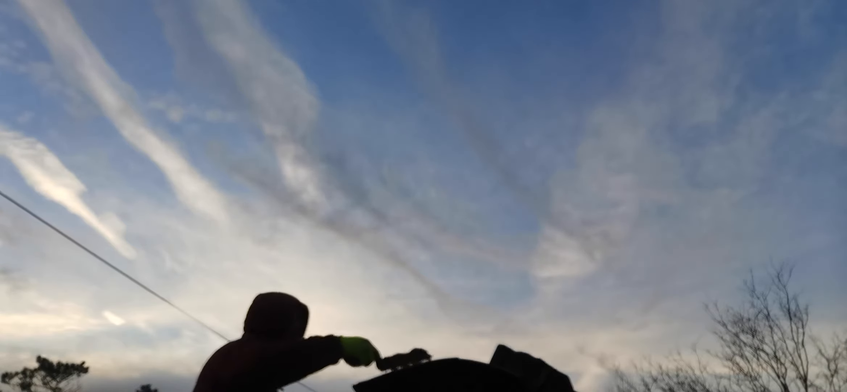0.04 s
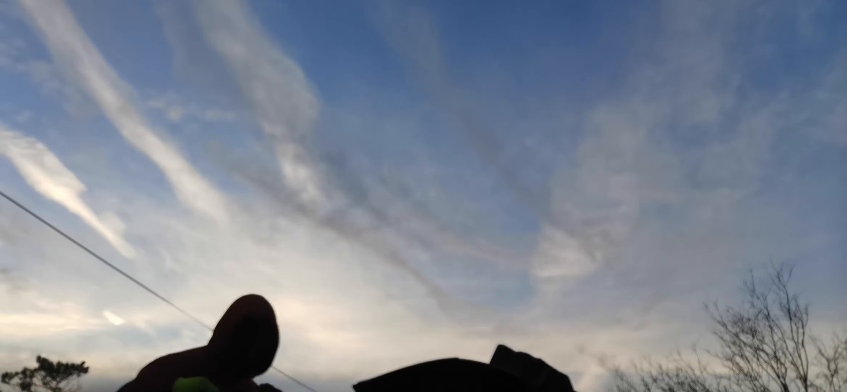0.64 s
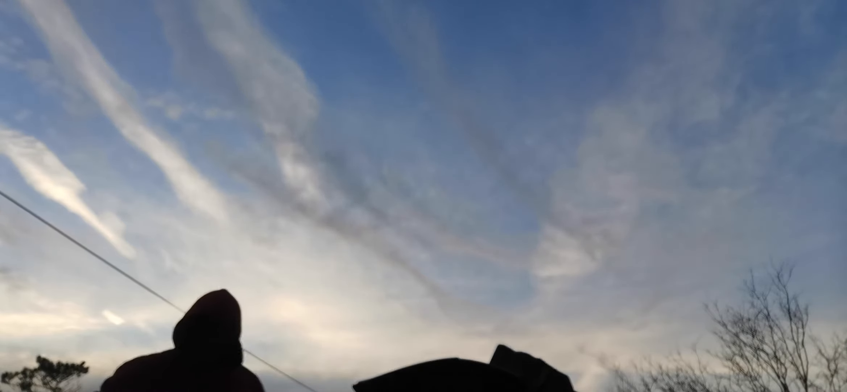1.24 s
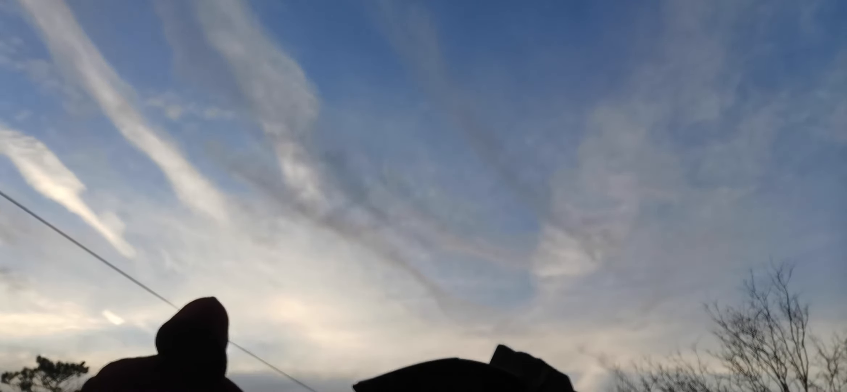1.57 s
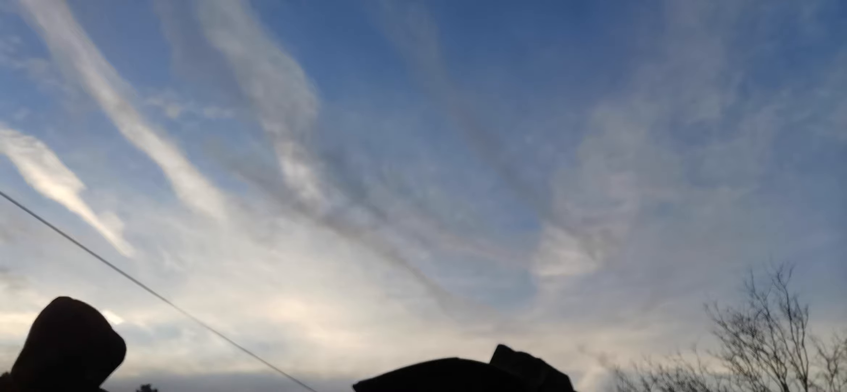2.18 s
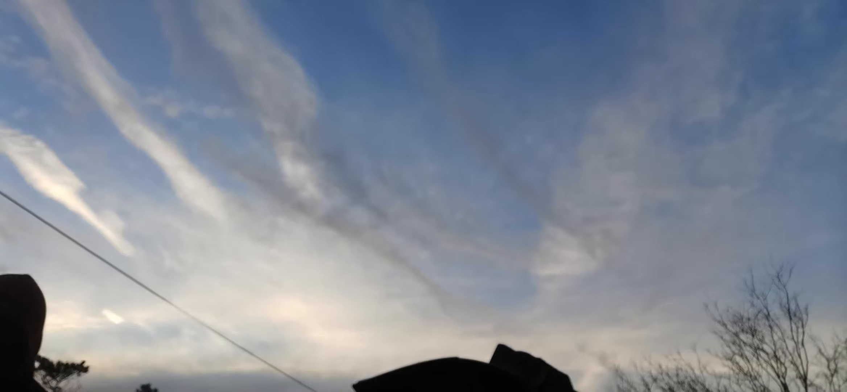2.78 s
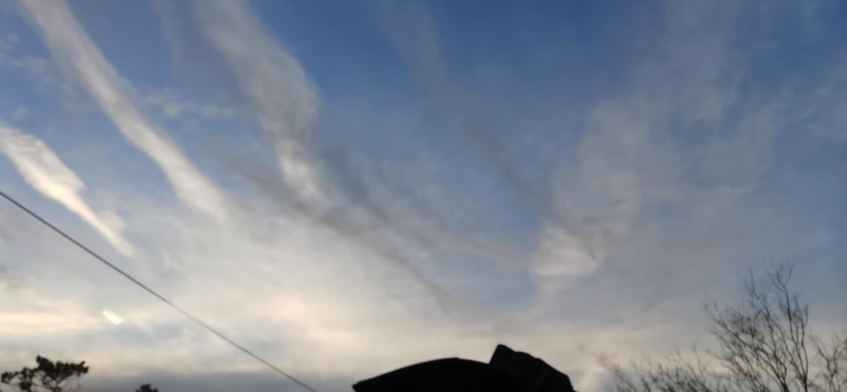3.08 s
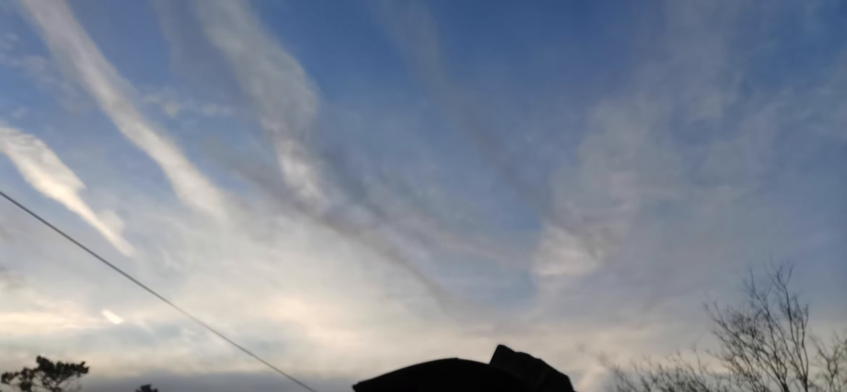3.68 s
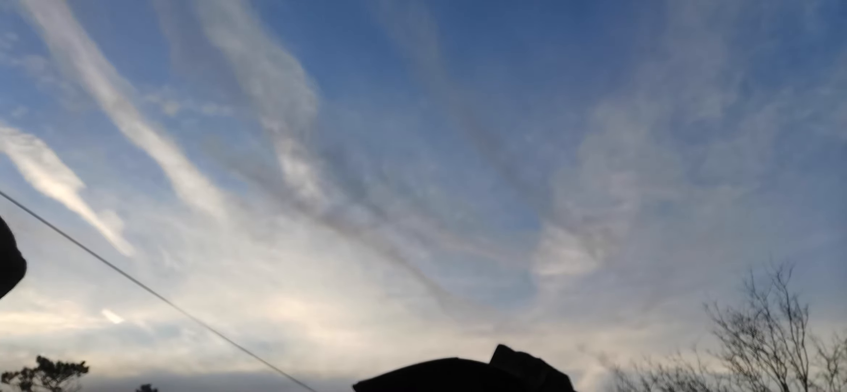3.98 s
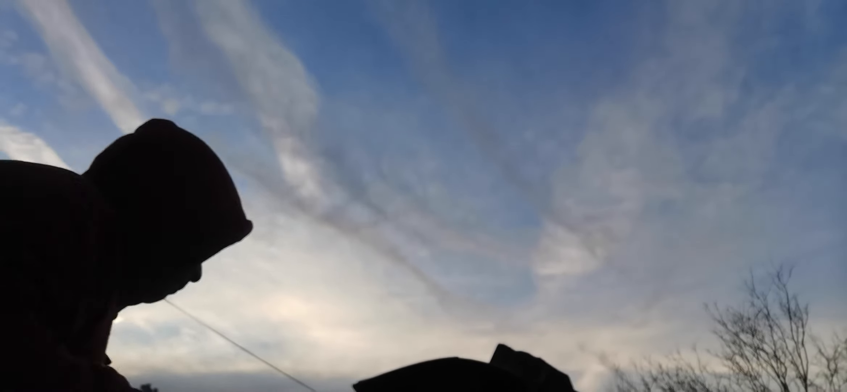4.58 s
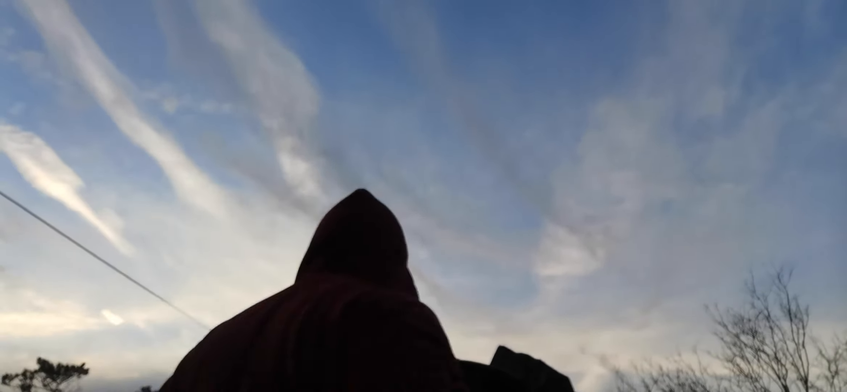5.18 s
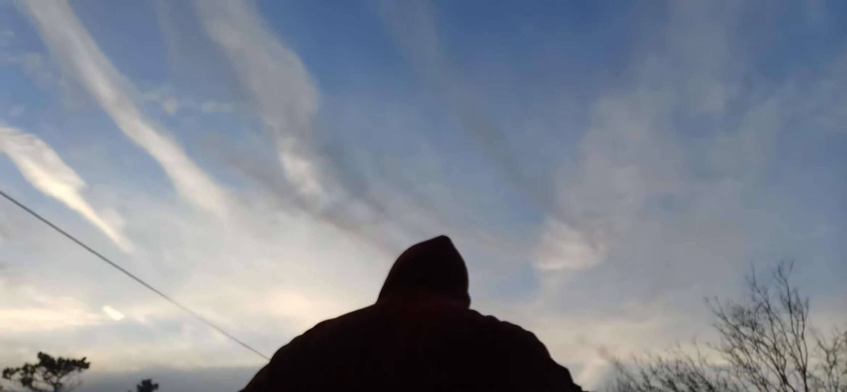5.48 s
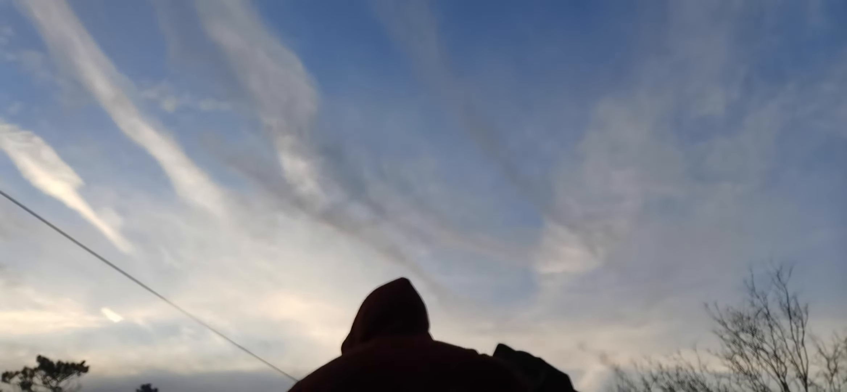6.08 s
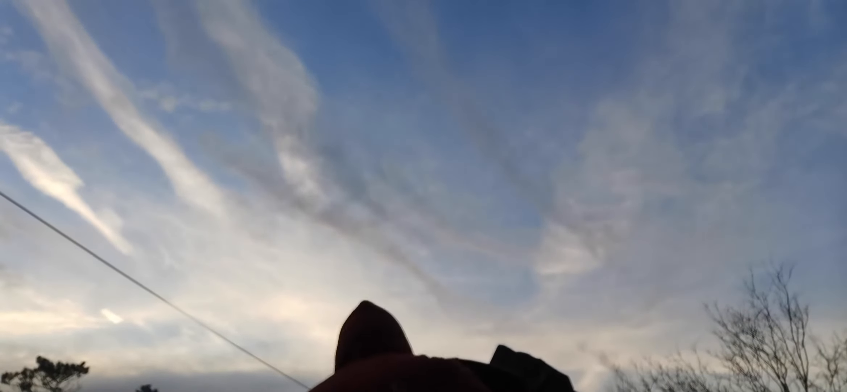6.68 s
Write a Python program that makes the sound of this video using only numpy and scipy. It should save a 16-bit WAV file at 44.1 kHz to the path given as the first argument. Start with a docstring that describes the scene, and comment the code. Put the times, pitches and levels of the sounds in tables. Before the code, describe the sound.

A low, distant outdoor rumble runs throughout. From about 1 second, boots knock and scuff softly on gritty scaffold boards, a little to the left. A louder, crunching step lands near 2 seconds, followed by a scrape and a bump on a hollow mortar tub. Lighter steps continue, with a scaffold tube faintly brushed just after 3 seconds and a soft sleeve swish near 4. From about 4 to 6 seconds the steps are heavier: the platform sways and booms, a loose fitting clicks, and the boards give high squeaks further left, in clusters around 4.3, 4.9 and 5.3 to 5.6 seconds. Just after 6 seconds another step lands and the tub is bumped again. At about 6.6 seconds a brick is set down with a hollow knock and clinks against another. Nearby walls add a faint echo.

```python
"""A bricklayer's boots knock and scuff on gritty scaffold boards outdoors, a little to the left.
The shifting weight makes the boards sway and boom, squeak on their supports and click a loose fitting.
Along the way a hollow mortar tub is bumped, a scaffold tube is brushed and sleeves swish.
At the end a brick is set down and clinks against another.
Nearby walls echo faintly, and a distant rumble lies under it all."""
import sys
import numpy as np
from scipy import signal
from scipy.fft import rfft, irfft, next_fast_len
from scipy.io import wavfile
from scipy.ndimage import map_coordinates

SR = 44100
rng = np.random.default_rng(int(sys.argv[2]) if len(sys.argv) > 2 else 0)


def store_pcm(level_fs):
    """Save levels as 16-bit WAV."""
    pcm = np.round(np.clip(level_fs, -1, 1) * 32767).astype(np.int16)
    wavfile.write(sys.argv[1], SR, np.atleast_2d(pcm).T)


N = 301644
T = np.arange(SR) / SR  # one second, the life of one sound

# A fade time (t60) is how long a sound takes to drop by 60 dB.
# distant rumble and hiss: (frequency [Hz], level [dB])
AIR_SPECTRUM = [(13, -50), (22, -14.5), (53, -5), (76, -16), (200, -24), (263, -30.5), (376, -32),
                (457, -32.5), (710, -36), (1170, -41.5), (1380, -45.5), (2260, -45), (2590, -52.5),
                (10900, -61), (16000, -58)]
# boots and loads landing: (time [s], knock [dB], softness = thud over knock [dB], crunch [dB])
LANDINGS = [(0.94, -54.5, -6.5, -52.5), (1.192, -44.5, -9, -64), (1.259, -54, 1, -50),
            (1.923, -30, -9, -41), (1.935, -25, -11, -33.5), (1.983, -41, 7.5, -49.5),
            (2.179, -41, -1, -60), (2.212, -45, 4, -55.5), (2.613, -38, -4.5, -54.5),
            (2.651, -39.5, -0.5, -52), (2.885, -51.5, -5.5, -63), (3.059, -44.5, -2.5, -62),
            (3.096, -43, 11, -41), (3.138, -43.5, 4.5, -47), (3.532, -44.5, 9, -51.5),
            (4.073, -38.5, -4.5, -38), (4.146, -31.5, 3, -66), (4.228, -41, 6.5, -48),
            (4.305, -43, 2.5, -42.5), (4.781, -41.5, 5.5, -71), (4.880, -43, 3.5, -49),
            (5.213, -41.5, -0.5, -57), (5.235, -35.5, 4, -40.5), (5.292, -44, 10.5, -44.5),
            (5.428, -34.5, -3, -44), (5.494, -46, -5, -49), (5.699, -54.5, 13.5, -56),
            (5.851, -62, -8, -60), (6.14, -35, -6, -36)]
# the boards' higher resonances: (frequency [Hz], width [Hz], level [dB])
BOARD_RESONANCES = [(338, 52, 6.5), (401, 13.5, 3), (428, 28, 0.5), (567, 83, 1.5), (789, 88, -8),
                    (924, 80, -11), (1075, 105, -20.5), (1620, 87, -33)]
# a dull thud: (frequency [Hz], level [dB])
THUD_SPECTRUM = [(40, -16), (90, -1.5), (170, 0), (230, -0.5), (340, -18), (600, -23), (1500, -71)]
# grit being crushed: (frequency [Hz], level [dB])
CRUNCH_SPECTRUM = [(300, -24), (800, 1.5), (1150, 3), (1350, -2.5), (1600, 0.5), (2300, -4), (3300, -10.5),
                   (5000, -15), (8000, -26), (16000, -53)]
# soles dragging over dry mortar: (time [s], length [s], level [dB])
SCUFFS = [(0.964, 0.22, -62), (1.091, 0.27, -70), (1.338, 0.62, -63.5), (1.51, 0.48, -64),
          (1.598, 0.19, -66.5), (1.927, 0.9, -61.5), (2.019, 0.12, -42), (2.099, 0.13, -55.5),
          (2.619, 0.52, -60), (3.082, 0.33, -56.5), (3.181, 0.3, -51), (3.532, 0.36, -55),
          (4.194, 0.4, -42.5), (4.782, 0.36, -63.5), (4.845, 0.28, -50.5), (5.212, 0.24, -48.5),
          (5.285, 0.33, -53), (5.429, 0.063, -47.5), (5.698, 0.23, -55), (6.196, 0.32, -69)]
# the hiss of rubbing: (frequency [Hz], level [dB])
RUB_SPECTRUM = [(300, -9), (1200, -4.5), (2500, -1.5), (4500, -3), (8000, -4.5), (11000, -8),
                (16000, -15.5)]
# a loose fitting snapping under the shifting weight: (time [s], level [dB])
CLICKS = [(1.258, -44.5), (1.267, -49.5), (4.075, -41.5), (4.197, -44.5), (4.216, -39.5), (4.293, -40),
          (4.362, -50.5), (4.399, -42), (4.845, -43.5), (4.896, -45), (5.043, -47.5), (5.163, -43),
          (5.298, -44.5), (5.531, -40.5), (5.651, -41.5), (5.793, -54), (5.892, -56.5), (5.923, -43.5)]
# a click's bright edge: (frequency [Hz], level [dB])
SNAP_SPECTRUM = [(300, -20), (1200, -2.5), (2500, -1), (5000, -2), (8000, -3.5), (12000, -6.5),
                 (16000, -12)]
# the fitting's ringing tones: (frequency [Hz], level [dB], fade time [s])
FITTING_TONES = [(1552, 4, 0.032), (1690, -8.5, 0.056), (2027, -25, 0.06), (2777, 0.5, 0.039),
                 (3750, -13, 0.052), (4490, -0.5, 0.043), (4810, 2.5, 0.032), (5600, -19, 0.022),
                 (6460, 2, 0.03), (7600, 3, 0.021), (10520, -0.5, 0.013)]
# the worker's weight bending the platform: (time [s], sway [dB], boom [dB])
LOADS = [(1.99, -26.5, -43), (2.683, -28.5, -44.5), (3.107, -19, -51), (3.571, -26, -41.5),
         (4.164, -12.5, -30), (4.232, -21, -25.5), (4.293, -25, -22), (4.820, -11, -37.5), (4.88, -34, -29),
         (5.304, -9, -29.5), (5.585, -22, -27), (5.735, -18, -34), (5.856, -28.5, -33)]
# the frame swaying: (frequency [Hz], level [dB], fade time [s])
SWAY_TONES = [(32.4, 3, 0.21), (48.2, -2, 0.2), (64.2, -6.5, 0.43)]
# a whole board booming: (frequency [Hz], level [dB], fade time [s])
BOOM_TONES = [(95, 1, 0.55), (142, -20, 0.082), (231.3, -22.5, 0.21)]
# the mortar tub bumped and nudged along: (time [s], level [dB])
TUB_BUMPS = [(2.181, -39), (2.208, -35.5), (2.220, -34), (6.143, -38)]
# the tub's ringing tones: (frequency [Hz], level [dB], fade time [s])
TUB_TONES = [(394, -1.5, 0.21), (557.4, -5, 0.15), (774, -11.5, 0.097), (1113, -8.5, 0.12),
             (1495, -11, 0.064), (1982, -19.5, 0.18), (2430, -20, 0.088), (2824, -27, .07)]
# a scaffold tube brushed in passing: (time [s], level [dB])
TUBE_TOUCHES = [(3.105, -48), (3.190, -54.5)]
# that tube's resonances: (frequency [Hz], width [Hz], level [dB])
TUBE_RESONANCES = [(605, 57, 4), (2480, 71, -4), (3200, 82, -11), (3720, 97, -22)]
# sleeves swishing: (time [s], rise time [s], level [dB])
SWISHES = [(3.779, 0.4, -63.5), (6.359, 0.16, -66.5)]
# a loaded board slipping on its support: (time [s], level [dB])
SQUEAKS = [(4.219, -34), (4.256, -30), (4.307, -28.5), (4.338, -39.5), (4.866, -33.5), (4.904, -30),
           (4.935, -38), (4.964, -37), (5.008, -48.5), (5.347, -30.5), (5.388, -32), (5.416, -34.5),
           (5.47, -38), (5.503, -39), (5.610, -32.5), (5.642, -40)]
# the rasp of one slip: (frequency [Hz], level [dB])
SLIP_SPECTRUM = [(2000, -16.5), (3400, -15.5), (4200, -4.5), (5000, -3), (5900, -12), (7000, -1.5),
                 (9000, -13), (11000, -23), (16000, -47.5)]
# a brick lands on its edge, drops flat, then hits its neighbour:
# (time [s], knock [dB], crack [dB], ring [dB], thud [dB])
BRICK_HITS = [(6.551, -34.5, -64, -46.5, -55), (6.560, -24.5, -45, -39, -44), (6.585, -24, -29.5, -22, -46)]
# the brick's ringing tones: (frequency [Hz], level [dB], fade time [s])
BRICK_TONES = [(1970, -10.5, 0.086), (2070, -5, 0.058), (3430, -13, 0.13), (3700, -11, 0.067),
               (3860, -2.5, 0.079), (4180, -8, 0.059), (4180, -5.5, 0.084), (4180, -4, 0.073),
               (4780, -19, .035), (5500, -33, .08), (7800, -29, 0.09)]
# the brick stack's resonances: (frequency [Hz], width [Hz], level [dB])
STACK_RESONANCES = [(499, 32, 4), (643, 115, -6.5), (800, 49, -4), (925, 71, -4.5), (1160, 120, -12),
                    (1490, 190, -20.5)]
# fine clay ticks: (frequency [Hz], level [dB])
TICK_SPECTRUM = [(2000, -33), (4000, -16), (5650, 14), (6300, -12), (7900, 3), (9000, -20), (10500, -6),
                 (13000, -10), (16000, -10)]
# where the worker stands: (time [s], left ear louder by [dB], left ear earlier by [ms])
WORKER_PATH = [(1.0, 4.5, 0.24), (2.0, 4.5, 0.31), (4.1, 3.5, 0.31), (4.3, 2.5, 0.033), (6.2, 3, 0.13)]
# how the microphone's body scales those two gaps: (frequency [Hz], level [factor], lead [factor])
EAR_FACTORS = [(146, 1.5, 1), (570, 0.3, 1), (845, 1.35, 1.61), (2400, 0.6, 1.05), (4140, 1.57, 0.87),
               (8000, 0.78, 0.99)]
# how alike noise is at the two ears: (frequency [Hz], likeness [0 to 1])
EAR_LIKENESS = [(60, 0.94), (500, 0.61), (1500, 0.083), (4000, 0.1), (12000, 0.083)]
# the echo from the walls: (frequency [Hz], fade time [s])
ECHO_FADES = [(100, 0.6), (500, 0.49), (2000, 0.36), (4200, 0.36), (6000, 0.13), (14000, 0.35)]


def amp(db):
    """Turns decibels into a number to multiply by."""
    return 10 ** (np.asarray(db) / 20)


def unit(x):
    """Scales a sound to an average power of 1."""
    return x / np.sqrt(np.mean(x ** 2) + 1e-20)


def along(points, hz):
    """Reads between (frequency, value) points on a log frequency scale."""
    frequencies, values = np.transpose(points)
    return np.interp(np.log(hz + 1), np.log(frequencies + 1), values)


def filtered(x, response):
    """Filters x; response(hz) says how each frequency is scaled and delayed."""
    size = x.shape[-1]
    padded = next_fast_len(size + 8192)
    hz = np.fft.rfftfreq(padded, 1 / SR)
    return irfft(rfft(x, padded) * response(hz), padded)[..., :size]


def colour(spectrum):
    """A filter that follows a spectrum table."""
    return lambda hz: amp(along(spectrum, hz))


def body(resonances):
    """A filter that favours an object's resonances, the pitches at which it shakes easily."""
    return lambda hz: sum((-1) ** k * amp(db) * 1j * hz * width / (peak**2 - hz**2 + 1j * hz * width)
                          for k, (peak, width, db) in enumerate(resonances))


def noise(response, size=SR):
    """Filtered stereo noise, alike at both ears in the bass."""
    def shared_and_opposite(hz):
        angle = np.arccos(along(EAR_LIKENESS, hz)) / 2
        return response(hz) * np.array([np.cos(angle), np.sin(angle)])
    mid, side = filtered(rng.standard_normal((2, size)), shared_and_opposite)
    return unit(np.array([mid + side, mid - side]))


def wobble(rate, size=SR):
    """A smooth curve through `rate` random values a second."""
    return map_coordinates(rng.standard_normal(int(size * rate / SR) + 4), [np.arange(size) * rate / SR])


def swell(rise, t60):
    """A loudness shape that climbs to 1, then dies away; both times are in seconds."""
    return np.minimum(T / rise, 1) * amp(-60 * np.maximum(T - rise, 0) / t60)


def burst(response, shape):
    """Many tiny contacts blur into noise with the outline and energy of `shape`."""
    return unit(noise(response) * shape) * np.sqrt(np.mean(shape ** 2))


def tap(resonances):
    """One clean tap on an object, with a peak of 1."""
    sound = filtered(1.0 * (T == 0), body(resonances))
    return sound / np.abs(sound).max()


def ring(tones, rise):
    """A struck object's fading tones, at slightly new strengths for each blow."""
    hz, db, t60 = np.transpose(tones)[:, :, None]
    gain = amp(db + rng.standard_normal(db.shape))
    waves = gain * amp(-60 * T / t60) * np.sin(2 * np.pi * hz * T)
    return waves.sum(0) * (1 - np.exp(-T / rise)) / np.linalg.norm(gain)


def add(track, time, sound):
    """Mixes a sound into a stereo track at a time in seconds."""
    part = track[:, max(round(time * SR), 0):][:, :SR]
    part += sound[..., :part.shape[1]]


def place(x, left_db, lead_ms):
    """A sound on the left is louder and earlier in the left ear, by amounts scaled for each frequency."""
    ear, factors = np.array([[.5], [-.5]]), np.array(EAR_FACTORS)

    def response(hz):
        gain = amp(ear * left_db * along(factors[:, [0, 1]], hz))
        lead_s = ear * lead_ms * along(factors[:, [0, 2]], hz) / 1000
        return gain * np.exp(2j * np.pi * hz * lead_s)
    return filtered(x, response)


def from_worker(x, time):
    """Places a sound where the worker stands at that time."""
    times, left_db, lead_ms = np.transpose(WORKER_PATH)
    return place(x, np.interp(time, times, left_db), np.interp(time, times, lead_ms))


def distant_rumble(start_db=-53.5, growth_db_per_s=0.45):
    """The outdoor background wavers gently and slowly grows."""
    db = start_db + growth_db_per_s * np.arange(N) / SR + 0.92 * wobble(5.47, N)
    return place(amp(db) * noise(colour(AIR_SPECTRUM), size=N), left_db=3.0, lead_ms=0.22)


def boot_knocks():
    """Each footfall taps the board, thuds and crushes grit; soft landings are slower and longer."""
    out = np.zeros((2, N))
    for time, knock_db, softness_db, crunch_db in LANDINGS:
        pitch = 1.282 if 5.1 < time < 6.0 else 1  # these steps land on a stiffer, higher board
        board = [(hz * pitch, width * pitch, db) for hz, width, db in BOARD_RESONANCES]
        slowness = 2 ** (softness_db / 16.5)  # 16.5 dB softer takes twice as long
        rise, t60 = 0.0037 * slowness, 0.2 * slowness
        hardness = min(0.0026 / rise, 1)  # a quick landing taps harder
        wood = amp(knock_db) * (amp(3) * hardness * tap(board) + burst(body(board), swell(rise, t60)))
        thud = amp(knock_db + softness_db) * burst(colour(THUD_SPECTRUM), swell(rise + 0.0019, t60 * 1.44))
        grains = amp(0.87 * wobble(576))
        crunch = amp(crunch_db) * burst(colour(CRUNCH_SPECTRUM), swell(rise * 0.68, t60 * 0.64) * grains)
        add(out, time, from_worker(wood + thud + crunch, time))
    return out


def sole_scuffs():
    """Sand grains roll and break under a sliding sole, making a rough hiss."""
    out = np.zeros((2, N))
    for time, length, db in SCUFFS:
        grains = amp(2.1 * wobble(1200) + 0.78 * wobble(130))
        add(out, time, amp(db) * burst(colour(RUB_SPECTRUM), swell(0.061 * length, length) * grains))
    return place(out, left_db=5.5, lead_ms=0.248)


def fitting_clicks(rattle_db=-14, scatter_s=0.035):
    """The loose fitting snaps and rings briefly; each squeak of the board also rattles it faintly."""
    out = np.zeros((2, N))
    rattles = [(time + scatter_s * rng.uniform(-1, 1), db + rattle_db) for time, db in SQUEAKS]
    for time, db in CLICKS + rattles:
        snap = burst(colour(SNAP_SPECTRUM), swell(0.0013, 0.017))
        add(out, time, amp(db) * (amp(2) * snap + amp(2.5) * ring(FITTING_TONES, rise=0.0012)))
    return place(out, left_db=5.5, lead_ms=0.039)


def platform_sway(rebound_s=0.168):
    """Weight sets the frame swaying and the board booming; both stir again as the frame springs back."""
    out = np.zeros((2, N))
    rebounds = [(time + rebound_s, sway_db - 13, sway_db - 23) for time, sway_db, _ in LOADS]
    for time, sway_db, boom_db in LOADS + rebounds:
        add(out, time, amp(sway_db) * ring(SWAY_TONES, rise=0.014))
        add(out, time, amp(boom_db) * ring(BOOM_TONES, rise=0.0054))
    return place(out, left_db=4.5, lead_ms=0.2)


def mortar_tub():
    """Light bumps make the hollow tub ring."""
    out = np.zeros((2, N))
    for time, db in TUB_BUMPS:
        add(out, time, amp(db) * ring(TUB_TONES, rise=0.0012))
    return place(out, left_db=5, lead_ms=0.15)


def scaffold_tube():
    """Rubbing stirs the tube into a rough, fading hum."""
    out = np.zeros((2, N))
    for time, db in TUBE_TOUCHES:
        add(out, time, amp(db) * burst(body(TUBE_RESONANCES), swell(0.0092, 0.58)))
    return place(out, left_db=0, lead_ms=0.12)


def sleeve_swishes():
    """Cloth rubs as an arm swings, making a slow, smooth hiss."""
    out = np.zeros((2, N))
    for time, rise, db in SWISHES:
        add(out, time, amp(db) * burst(colour(RUB_SPECTRUM), swell(rise, t60=0.31)))
    return place(out, left_db=5.5, lead_ms=0.248)


def board_squeaks(pitch_hz=5000, slips=4, slip_s=0.0038, gap_s=0.018, loss_db=9.5):
    """The board sticks and slips on its support; each slip is a tiny rough chirp, weaker than the last."""
    out = np.zeros((2, N))
    for time, db in SQUEAKS:
        for k in range(slips):
            length = slip_s * np.exp(0.18 * rng.standard_normal())
            shape = swell(length * 0.35, length * 2.1)
            detune = np.exp(0.023 * rng.standard_normal())
            hz = pitch_hz * detune * np.exp(0.049 * wobble(700))
            tone = np.sqrt(2) * np.sin(2 * np.pi * np.cumsum(hz) / SR) * shape
            rasp = burst(lambda f: colour(SLIP_SPECTRUM)(f / detune), shape)
            add(out, time, amp(db - k * loss_db) * (0.26 * tone + 0.47 * rasp))
            time += gap_s * np.exp(0.44 * rng.standard_normal())
    return place(out, left_db=16.5, lead_ms=0.15)


def brick_clink():
    """The stack gives a hollow knock; the hard clay cracks and chatters, roughening its brief ring."""
    out = np.zeros((2, N))
    clay = body([(hz, 110, db) for hz, db, _ in BRICK_TONES])  # each tone widened to 110 Hz
    for time, knock_db, crack_db, ring_db, thud_db in BRICK_HITS:
        clatter = burst(body(STACK_RESONANCES), swell(0.00086, 0.059))
        knock = amp(knock_db) * (amp(6.5) * tap(STACK_RESONANCES) + clatter)
        crack = amp(crack_db) * burst(colour(CRUNCH_SPECTRUM), swell(0.0035, 0.1))
        ticks = amp(-50) * burst(colour(TICK_SPECTRUM), swell(0.001, 0.11))
        thud = amp(thud_db) * burst(colour(THUD_SPECTRUM), swell(0.013, 0.36))
        chatter = burst(clay, swell(0.0038, 0.068))
        clink = amp(ring_db) * (amp(0.2) * ring(BRICK_TONES, rise=0.00088) + amp(-3.5) * chatter)
        add(out, time, knock + crack + ticks + thud + clink)
    return place(out, left_db=4.5, lead_ms=0.2)


def wall_echo(x, rise_s=0.016):
    """Nearby walls throw the sound back, each frequency dying at its own speed."""
    hz, t, spectrum = signal.stft(rng.standard_normal((2, SR // 2)), SR, nperseg=256)
    fade = amp(-60 * t / along(ECHO_FADES, hz)[:, None])
    _, tail = signal.istft(spectrum * fade, SR, nperseg=256)
    tail *= np.minimum(T[:tail.shape[1]] / rise_s, 1)
    return signal.fftconvolve(x, tail / np.linalg.norm(tail[0]), axes=1)[:, :N]


def scene():
    """Mixes all the sounds; the work noises, squeaks and brick also echo faintly."""
    work = boot_knocks() + sole_scuffs() + sleeve_swishes()
    work += fitting_clicks() + mortar_tub() + scaffold_tube()
    squeaks, brick = board_squeaks(), brick_clink()
    echo = wall_echo(amp(-17.5) * work + amp(-23) * squeaks + amp(-23.5) * brick)
    return work + squeaks + brick + platform_sway() + echo + distant_rumble()


def record(dry, top_hz=16200):
    """Steeply cuts off the very highest treble."""
    return filtered(dry, lambda hz: 1 / (1 + (hz / top_hz) ** 120))


dry = scene()
out = record(dry)
store_pcm(out)
```